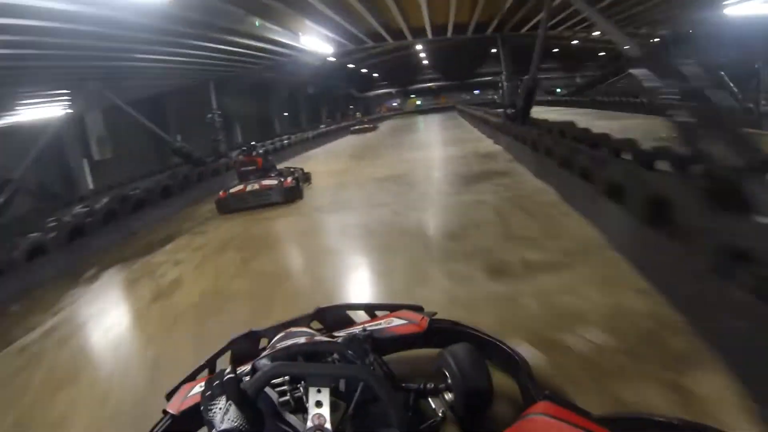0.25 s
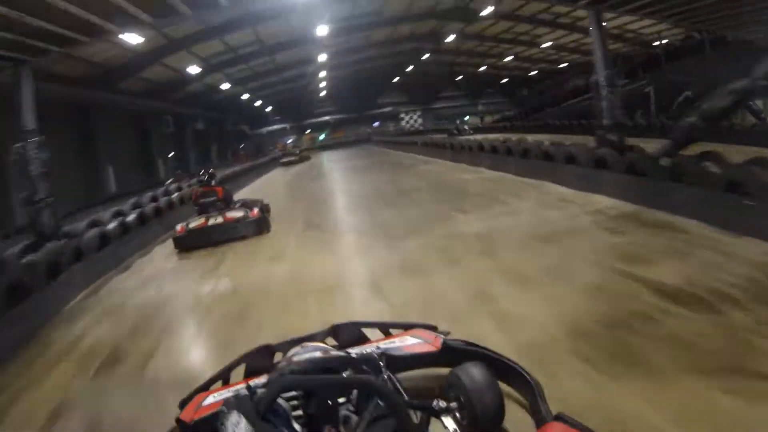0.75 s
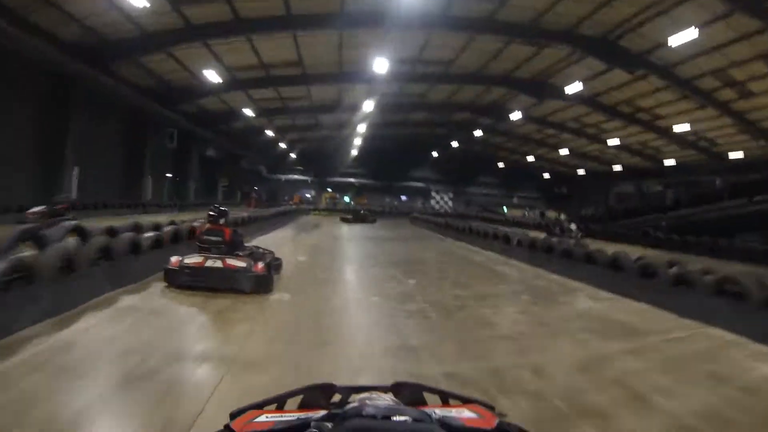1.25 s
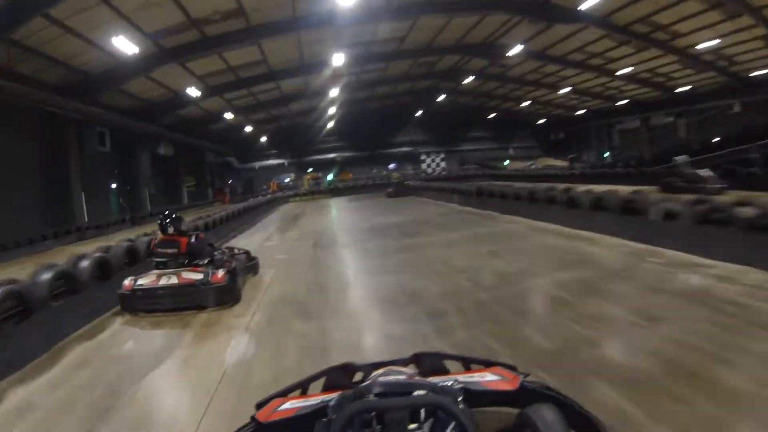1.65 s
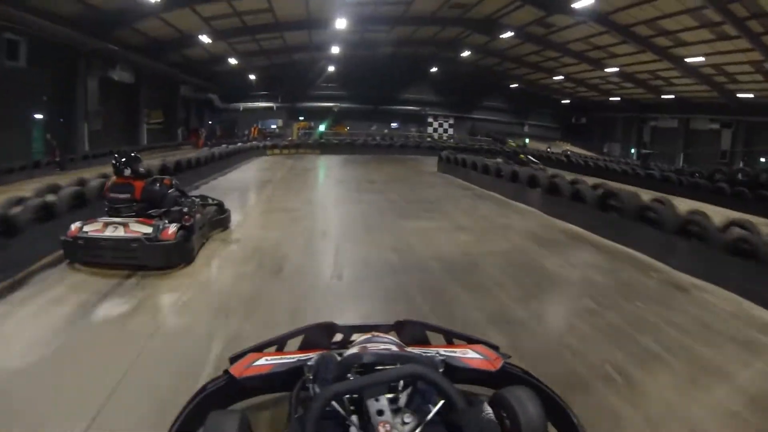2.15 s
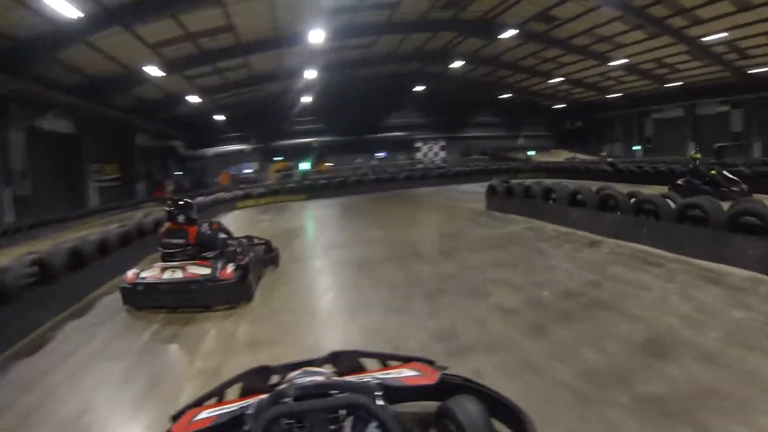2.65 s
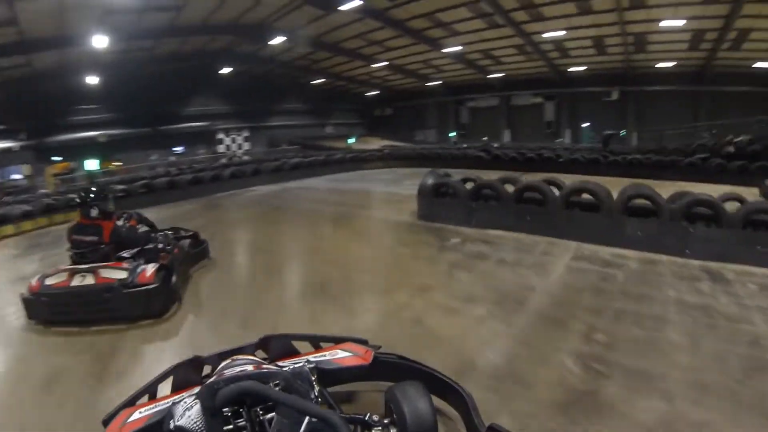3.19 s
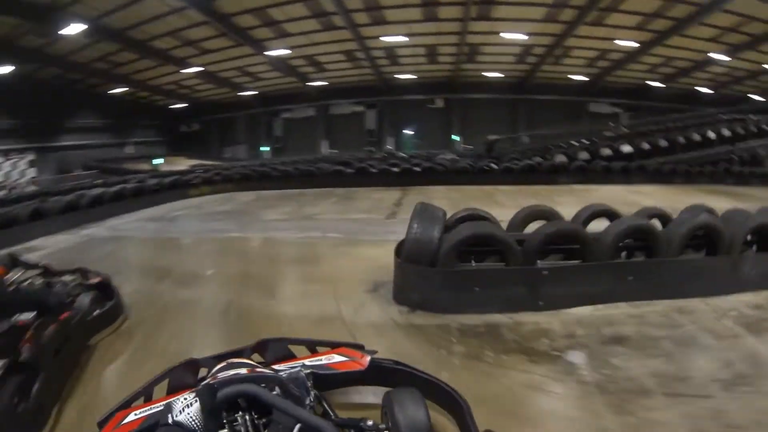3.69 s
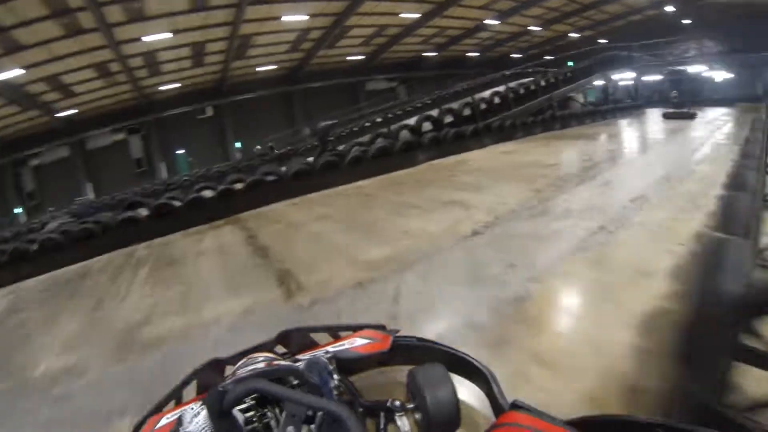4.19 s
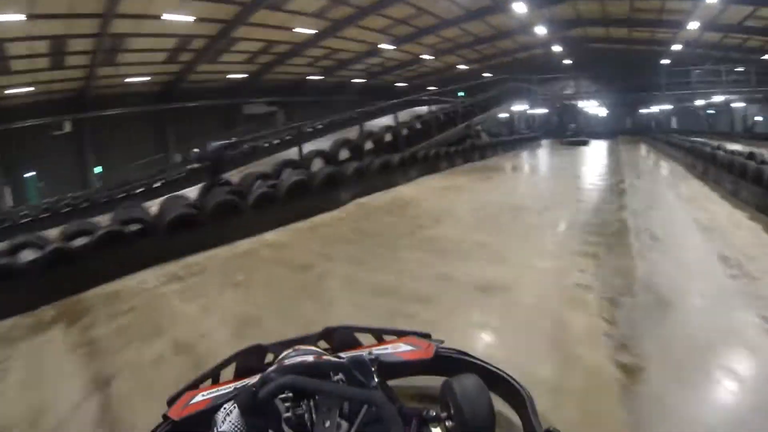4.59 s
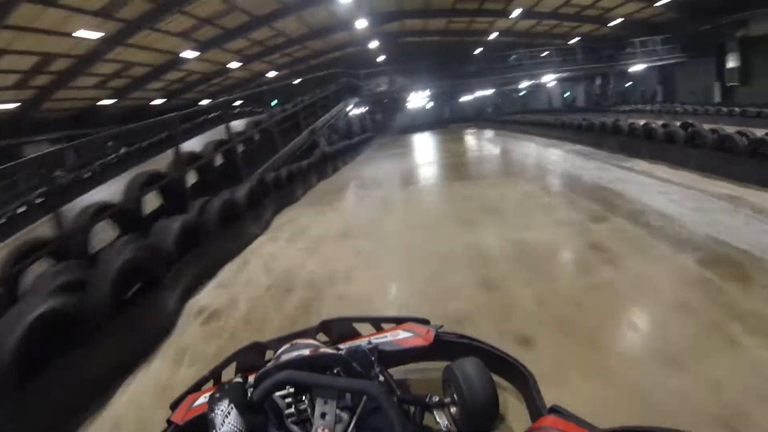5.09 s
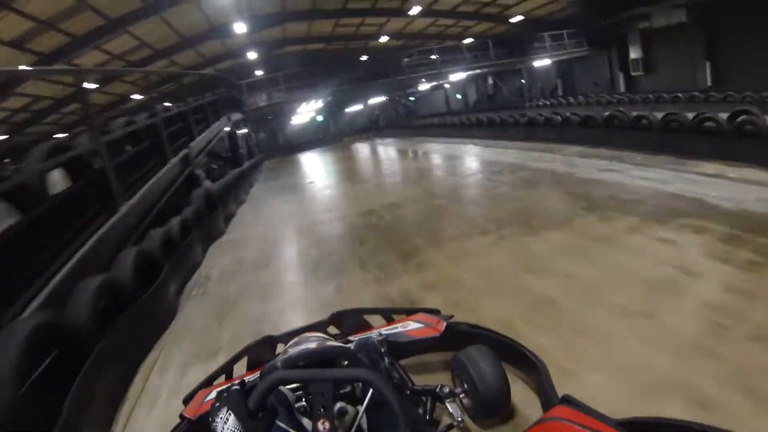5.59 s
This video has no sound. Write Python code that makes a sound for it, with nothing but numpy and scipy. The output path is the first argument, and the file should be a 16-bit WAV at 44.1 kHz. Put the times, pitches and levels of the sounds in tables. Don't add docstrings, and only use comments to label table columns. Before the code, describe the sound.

A petrol go-kart heard from inside a sealed case on the driver's helmet at an indoor track. From 0 to 1.6 seconds it runs flat out: a very heavy, rapid low throb near 33 beats a second, steady muffled engine and tyre roar, and dry plastic buzzing with tiny high squeaks, thickest between 0.4 and 0.95, including lower latch creaks. Sparser chirps follow the firings. Around 1.65 a sharp creak and grit ticks mark the throttle closing; at 1.8 a deep, short jolt briefly dulls the treble. The kart coasts, revs sinking, rattle fading, with bumpy low shakes near 2.4 and 2.9 and a neighbouring kart's faint low drone. At 3.5 the throttle stabs open, drops at 3.75, and reopens at 3.9. Low shakes swell near 3.6 and 4.45. The engine pulls slowly upward at about 24 beats, while scratchy squeaks crowd in from 4.3, harshest near 5.7, until it cuts off still driving.

```python
import sys
import numpy as np
from scipy import signal
from scipy.fft import rfft, irfft, next_fast_len
from scipy.io import wavfile
from scipy.ndimage import uniform_filter1d, map_coordinates

SR = 44100
rng = np.random.default_rng(int(sys.argv[2]) if len(sys.argv) > 2 else 0)


def gain_from_db(level_db):
    decades = np.asarray(level_db, float) / 20
    return 10 ** decades


def dump(signal):
    limited = np.clip(np.atleast_2d(signal).T, -1, 1)
    pcm = np.round(limited * 32767).astype(np.int16)
    wavfile.write(sys.argv[1], SR, pcm)


N = 257544

# time in seconds, firings per second.
FIRING_RATE = [(0, 32.7), (.22, 32.1), (.6, 33), (1.02, 32.5), (1.14, 33.1), (1.62, 34.3), (1.9, 29),
               (2.2, 25.3), (2.6, 23.6), (3.0, 22.5), (3.5, 21.8), (3.67, 22.6), (3.81, 21.8), (4.16, 23.1),
               (4.3, 24.3), (5.05, 24.6), (5.68, 25.2), (5.84, 25.8)]
# time in seconds, opening from 0 to 1.
THROTTLE_OPENING = [(0, 1), (1.6, 1), (1.68, .1), (3.45, .1), (3.55, 1), (3.69, 1), (3.75, .25),
                    (3.87, .25), (3.92, 1), (5.84, 1)]
# frequency in Hz, level in dB.
PIPE_SPECTRUM = [(40, -6), (70, -0.5), (100, 5), (145, 4.5), (175, -10), (222, -2), (245, -13), (272, -2.5),
                 (298, -7.5), (324, 3.5), (345, -6.5), (370, -13), (440, -17.5), (600, -19.5), (2000, -140)]
# time in seconds, extra shake in dB.
FLOOR_BUMPS = [(0.03, 3), (0.12, 5.5), (0.28, 5.5), (0.35, 5.5), (0.45, 5), (0.55, 0.5), (0.7, 2.5),
               (0.9, 5.5), (1.02, 4), (1.41, 5), (1.53, 1), (1.95, 10.5), (2.44, 16), (2.62, 3), (2.9, 10),
               (3.25, 4), (3.4, 6), (3.58, 12.5), (3.68, 12), (4.0, 6), (4.2, -4), (4.36, 11), (4.46, 15.5),
               (4.56, 10.5), (4.72, -2), (5.04, 3.5), (5.3, 4.5), (5.58, 7), (5.7, 6), (5.82, -3)]
# frequency in Hz, density in dB per Hz.
ROCK_SPECTRUM = [(12, -14), (24, -4), (44, 0), (62, -11.5), (90, -30), (200, -36), (400, -37), (600, -50),
                 (2000, -140)]
# frequency in Hz, density in dB per Hz.
SWAY_SPECTRUM = [(0, -54), (2, 4.0), (6, -7.5), (14, -2.0), (22, -6.5), (40, -85), (200, -160)]
# start in seconds, level in dB, ring in Hz, t60 in seconds.
FLOOR_JOINTS = [
    (1.801, -3, 40.8, 0.17),
    (2.927, -26, 46.2, 0.1),
    (4.328, -34, 40.3, 0.42),
]
# time in seconds, level in dB.
ROAR_LEVEL = [(0, -35), (.45, -35.5), (.6, -33), (.75, -35.5), (1.2, -33), (1.75, -34), (2.2, -35.5),
              (3.3, -37), (3.66, -36), (4.1, -36), (4.55, -37), (4.7, -35.5), (5.84, -36)]
# frequency in Hz, density in dB per Hz.
CASE_SPECTRUM = [(180, 0.5), (300, -5), (540, -10), (850, -6.5), (1070, -2), (1990, -4), (2460, -16.5),
                 (3130, -7), (3700, -16.5), (4800, -20), (6300, -36), (7000, -37), (8000, -36.5),
                 (12500, -48), (15500, -65)]
# frequency in Hz, width in Hz, boost in dB.
WALL_MODES = [(1027, 43, 5.5), (1220, 270, 3.5), (1857, 114, 4.5), (2016, 97, 4.5), (2627, 280, 7),
              (3100, 250, 0)]
# start in seconds, peak in dB, first and last slip rate in Hz, length in seconds.
STRAIGHT_SQUEAKS = [(0.073, -32, 4840, 5800, 0.015), (0.2005, -34, 5540, 5200, 0.019),
                    (0.2165, -41, 5500, 4960.0, 0.019), (0.3712, -34, 5650, 5600, 0.014),
                    (.376, -33, 4700, 4300, .006), (.426, -35, 5120, 4920, .012),
                    (0.384, -30.5, 5590.0, 5770.0, 0.022), (0.4031, -32, 5850, 5950, 0.019),
                    (0.419, -40, 5210.0, 5230, 0.025), (0.5078, -37, 4430, 5020.0, 0.034),
                    (0.5398, -30, 5580, 5540.0, 0.015), (0.5527, -33, 5700, 5100, 0.015),
                    (0.6316, -28, 5210.0, 4480, 0.016), (0.6455, -27, 5130, 5580.0, 0.016),
                    (0.6615, -22, 4920, 5030, 0.016), (0.6894, -37, 4250.0, 4960.0, 0.02),
                    (0.7842, -27, 5960, 5500, 0.013), (0.7972, -28, 4800, 5300, 0.014),
                    (0.8122, -23, 4720, 4760, 0.012), (0.8381, -31, 5600.0, 5450, 0.024),
                    (0.862, -36, 5360, 4650.0, 0.016), (0.9049, -29, 4930, 5750, 0.018),
                    (0.9199, -28.5, 5540, 5160.0, 0.015), (0.9339, -33, 5800, 5120.0, 0.017)]
# start in seconds, peak in dB,
# first and last slip rate in Hz, length in seconds.
LATCH_CREAKS = [(0.308, -24, 3100, 3060, 0.0093), (0.416, -22, 2930, 2700, 0.022),
                (0.44, -18, 2700, 2600, 0.011), (0.514, -19.5, 2770, 2780, 0.024),
                (0.532, -19.5, 3050, 3150, 0.024), (0.574, -14.5, 3100, 3100, 0.01),
                (0.809, -21, 3240, 3180, 0.015), (0.499, -20, 1970, 1830, .02),
                (0.535, -23.5, 1935, 1760, 0.0255), (0.574, -19, 1810, 1810, 0.023),
                (0.635, -14, 1766, 1890, 0.014), (0.66, -17.5, 1914, 2010, 0.028)]
# start in seconds, peak in dB, first and last slip rate in Hz, length in seconds.
FADING_SQUEAKS = [(0.998, -27, 5500, 5500, 0.0063), (1.029, -29, 5600, 5500, 0.0074),
                  (1.061, -28, 5000, 5200, .007), (1.091, -28, 5600, 5800, .007),
                  (1.153, -35, 4100, 4470, 0.009), (1.18, -26, 5730, 5700, 0.0088),
                  (1.214, -36, 4700, 4400, .006), (1.243, -31, 4700, 4200, 0.011),
                  (1.272, -24.5, 5850, 5230, 0.0093), (1.305, -33, 5560, 5700, .008),
                  (1.362, -27, 5600, 5500, .006), (1.392, -32, 5600, 5730, .008),
                  (1.484, -32, 4740, 4900, .015), (1.503, -33, 5500, 5500, .008),
                  (1.507, -24, 4800, 4600, 0.007), (1.522, -27, 5440, 4540, 0.0098),
                  (1.536, -30, 5500, 4830, 0.016), (1.578, -42, 4930, 4900, 0.016),
                  (1.649, -16, 3190, 3100, 0.007)]
# start in seconds, peak in dB,
# first and last slip rate in Hz, length in seconds.
BEND_SQUEAKS = [(3.4536, -25, 4550, 5970, 0.014), (3.469, -28, 5470, 6000, 0.02),
                (3.5868, -27.5, 4480, 5300, 0.013), (3.5984, -29, 5660.0, 5600, 0.019),
                (3.981, -31, 5630, 6100, 0.015), (3.9959, -33, 6610.0, 6000, 0.016),
                (4.1, -30.5, 5750, 5600, .011), (4.1096, -24, 4200, 5160, 0.011),
                (4.2294, -27, 5500, 5760.0, 0.011), (4.241, -30, 4700, 4960.0, 0.01),
                (4.2982, -24.5, 4950, 5200, 0.023), (4.3182, -24, 5530, 5770.0, 0.013),
                (4.3341, -30, 6290.0, 5900, 0.017), (4.3711, -33, 4740, 5600.0, 0.019),
                (4.385, -34, 5580, 5660.0, 0.027), (4.404, -26.5, 5500, 4950.0, 0.035),
                (4.4245, -27, 4840, 5000, 0.013), (4.4349, -26, 5240, 4870.0, 0.02),
                (4.4579, -37, 6040, 6850, 0.019), (4.5024, -19, 4430, 4950, 0.0116),
                (4.514, -33, 5750, 6040, .014), (4.6365, -27.5, 5460.0, 5950.0, 0.02),
                (4.656, -32, 5820, 5500, 0.036), (4.678, -26, 5110, 5070, 0.025),
                (4.704, -22, 5570, 5900, 0.016), (4.7213, -29, 5620, 5240.0, 0.013),
                (4.7526, -24, 5200, 4900, 0.0081), (4.7632, -29, 4710.0, 4900, 0.017),
                (4.7781, -30, 5120.0, 5440, 0.025)]
# start in seconds, peak in dB,
# first and last slip rate in Hz, length in seconds.
POWER_SQUEAKS = [(4.8041, -25, 4950, 4780, 0.012), (4.815, -22, 4500, 4700, .009),
                 (4.796, -29, 5600, 5400, .008), (4.83, -18.5, 4440, 5100, 0.0091),
                 (4.8819, -26, 4840.0, 4120, 0.025), (4.9049, -30, 5660, 5580, 0.02),
                 (4.9238, -24, 4760.0, 4540.0, 0.015), (4.9388, -24, 4040, 4640, 0.014),
                 (4.9498, -22, 4900, 4910.0, 0.014), (4.9687, -28, 6100, 5890.0, 0.034),
                 (4.9956, -24.5, 5010.0, 4670.0, 0.032), (5.0256, -38, 6080, 5520, 0.027),
                 (5.0575, -22, 4820, 5130, 0.013), (5.0725, -27, 5000, 4900, 0.017),
                 (5.0874, -20.5, 5730, 5730, 0.015), (5.1024, -36, 5700.0, 5530, 0.03),
                 (5.1373, -29, 4180, 4730, 0.014), (5.1693, -26.5, 4900.0, 5000, 0.03),
                 (5.1902, -27, 4820, 5160.0, 0.0175), (5.2062, -24, 5440.0, 5350.0, 0.023),
                 (5.2291, -26, 5600, 4930.0, 0.019), (5.2511, -39, 4540, 4790.0, 0.023),
                 (5.285, -28, 4640, 5010.0, 0.02), (5.3029, -23, 4990, 4550.0, 0.013),
                 (5.3129, -21, 4830, 4840.0, 0.015), (5.3359, -28, 5200, 4930, 0.017),
                 (5.3558, -20, 4970.0, 4790.0, 0.0074), (5.3808, -26, 4180.0, 4580.0, 0.009),
                (5.3927, -24, 5060.0, 4960.0, 0.011), (5.4087, -23.5, 4670.0, 4590.0, 0.0091),
                (5.4227, -27.0, 4730.0, 4460, 0.035), (5.4526, -31, 5000.0, 5040.0, 0.014),
                (5.4756, -25, 4940.0, 4200, 0.021), (5.4935, -28, 4360, 4680.0, 0.015),
                (5.5364, -45, 4580.0, 4390.0, 0.021), (5.5584, -37, 4100.0, 4390.0, 0.013),
                (5.5713, -46, 5040.0, 4930, 0.014), (5.5963, -20.5, 4340.0, 4500, 0.01),
                (5.6063, -18.5, 4720, 4970, 0.0099), (5.6202, -35, 4540.0, 5000, 0.016),
                (5.6382, -22.5, 5110.0, 4650.0, 0.021), (5.6731, -16, 4120, 4990.0, 0.016),
                (5.7145, -16, 4420, 5100, 0.008), (5.722, -20, 4880, 4430, 0.012),
                (5.7589, -20, 4210, 4570.0, 0.014), (5.7888, -23, 4520.0, 5420.0, 0.029),
                (5.8268, -32, 4930.0, 4900, 0.016)]
# start in seconds,
# peak in dB, first and last slip rate in Hz, length in seconds.
EXTRA_SQUEAKS = [(0.66, -34, 5660, 5550, 0.02), (4.335, -36, 6700, 6600, .015),
                 (4.43, -36, 6600, 6860, .015), (4.964, -37, 6600, 6070, 0.023),
                 (4.99, -39, 5800, 5700, 0.022), (5.013, -37, 4360, 4200, 0.019),
                 (5.035, -29, 5800, 5200, 0.017), (5.157, -35, 5800, 5600, 0.039),
                 (5.201, -35, 5800, 6300, 0.033), (5.245, -37, 5700, 6300, .03),
                 (5.29, -38, 5600, 5700, 0.033), (5.33, -33, 5800, 5700, 0.022),
                 (5.385, -36, 5500, 5570, .02), (5.445, -40, 5300, 5500, .02),
                 (5.583, -32, 5800, 5700, .012), (5.685, -38, 5600, 6300, 0.011),
                 (5.736, -31, 4600, 4440, .02), (5.772, -26, 4540, 4400, .014),
                 (5.812, -28, 5500, 5300, .012), (5.558, -32, 4200, 4400, 0.0091),
                 (5.076, -38, 2820, 2810, .02), (4.908, -33, 5600, 5500, .015)]
# time in seconds, level over the chatter in dB, slip rate in Hz.
JOINT_STRAIN = [(0, 2.5, 5510), (3.3, 9.5, 5550), (4.5, -1, 5400), (4.7, 10.5, 5300), (5.1, 9.5, 5290),
                (5.5, 8, 4725), (5.72, 12, 4710), (5.84, 16, 5170)]
# frequency in Hz, width in Hz, level in dB.
MOUNT_MODES = [(4295, 91, 8), (4840, 220, 1.5), (5660, 51, 4.5), (6300, 300, -30), (9800, 700, 12.5),
               (11240, 700, 5)]
# time in seconds, chatter level in dB.
MOUNT_PLAY = [(0, -51), (.72, -49), (.78, -45.5), (1.46, -54.5), (1.63, -53), (3.19, -73), (3.43, -56.5),
              (4.2, -54), (4.6, -49.5), (4.86, -50.5), (4.92, -44), (5.3, -46), (5.58, -56.5), (5.84, -45)]
# time in seconds, extra chatter in dB.
HEAD_JERKS = [(0.08, 6.5), (0.18, 2), (0.39, 2), (0.43, 7), (0.52, 9), (0.56, 8), (0.67, 15), (0.84, 6),
              (0.93, -3), (1.51, 9.5), (3.48, -7), (3.61, 3), (3.99, -5), (4.11, 5), (4.24, 1), (4.31, 2),
              (4.41, 6), (4.8, 5.5), (5.61, 7), (5.72, 3), (5.8, 8)]
# frequency in Hz, density in dB per Hz.
CHATTER_SPECTRUM = [(1500, -55), (2700, -22), (3100, -5), (3800, -3.5), (4900, 2.5), (5700, 0),
                    (7000, -7.5), (8800, -11), (10000, -13), (12000, -14.5), (13000, -15), (15500, -44)]
# start in seconds, level in dB.
GRIT_TICKS = [
    (1.6495, -42),
    (1.651, -41),
    (1.797, -49),
]
# peak in seconds, level in dB, pitch
# in Hz, length in seconds.
BRIEF_HUMS = [(0.26, -34.5, 194, 0.3), (2.355, -37.5, 685, 0.066), (5.75, -37.5, 434, 0.04),
              (1.49, -41.5, 310, 0.25), (2.962, -17, 42, 0.12), (2.545, -20.5, 37, 0.21),
              (4.84, -19.5, 44, 0.093), (4.3, -40.5, 220, .2), (5.7, -46, 790, 0.56),
              (0.9, -34.5, 167, 0.041), (4.3, -38, 78, 0.35), (2.28, -40.5, 120, 0.24),
              (0.0377, -35, 135, 0.1)]
# time in seconds, level in dB.
RIVAL_LEVEL = [(0, -48), (1.7, -67), (2.2, -59), (2.5, -46), (3.2, -48), (3.55, -48), (3.75, -65),
               (3.95, -50), (4.2, -50), (5.84, -48)]
# frequency in Hz, level in dB.
RIVAL_SPECTRUM = [(120, -59), (180, -5.5), (215, 2.5), (255, -4.5), (340, -28), (1000, -140)]
# time in seconds, treble gain in dB.
GAIN_DUCK = [(0, 2), (1.815, -0.5), (1.83, -9), (1.86, -7), (1.92, -1), (5.84, 0)]
# centre in seconds, half length in seconds, depth from 0 to 1.
THIN_MOMENTS = [
    (.8155, .007, .97),
    (1.587, .0035, .9),
    (4.659, .0045, .9),
    (5.026, .007, .99),
    (5.086, .006, .94),
    (5.744, .007, .97),
]
# low edge in Hz, high edge in Hz.
THIN_BANDS = [
    [(3050, 3400), (4450, 5050)],
    [(2600, 3350), (4750, 5100)],
    [(5300, 6300)],
    [(4100, 5050)],
    [(2650, 2950), (4700, 5050), (5400, 5750)],
    [(4050, 5250)],
]

SEAT_HZ, SEAT_WIDTH_HZ, SEAT_PEAK_DB = 34.05, 10.8, 18
SEAT_FLUTTER_DB = 0.7
CRANK_DAMP = 0.16
SHAKE_SHUT_DB, SHAKE_OPEN_DB = -38, -35
CRANK_SHUT_DB, CRANK_OPEN_DB = -36, -34
THUD_SHUT_DB, THUD_OPEN_DB = -59, -39.5
LUG_DB_PER_HZ = 0.3
CRANK_SHARE, ROCK_SHARE, THUD_SHARE = 0.62, 0.89, 0.034
ROCK_DB, SWAY_DB, SWAY_SWING_DB = -35.5, -29, 2.5


def unit(x):
    return x / np.sqrt(np.mean(x ** 2) + 1e-20)


def along(points, hz):
    f, v = np.transpose(points)
    return np.interp(np.log(hz + 1), np.log(f + 1), v)


def curves(rows):
    s, *columns = np.transpose(rows)
    return [np.interp(np.arange(N) / SR, s, column) for column in columns]


def swells(rows, rise_s, fall_s):
    t = np.arange(N) / SR
    each = [np.interp(t, [s - rise_s, s, s + fall_s], [0, db, 0]) for s, db in rows]
    return np.max(each, axis=0)


def wobble(rate, size=N):
    knots = rng.standard_normal(int(size * 4000 / SR) + 9)
    return map_coordinates(knots, [np.arange(size) * min(rate, 4000) / SR])


def filtered(x, response):
    m = next_fast_len(N + SR // 2)
    return irfft(rfft(x, m) * response(np.fft.rfftfreq(m, 1 / SR)), m)[:N]


def coloured(x, spectrum):
    return unit(filtered(x, lambda hz: gain_from_db(along(spectrum, hz))))


def pressing():
    return swells(FLOOR_BUMPS, rise_s=0.07, fall_s=0.09)


def looseness():
    return curves(MOUNT_PLAY)[0] + swells(HEAD_JERKS, rise_s=0.053, fall_s=0.047)


def engine_cycles():
    return np.cumsum(curves(FIRING_RATE)[0]) / SR + 0.857


def seat_shake(cycles):
    rate, opening, bump_db = curves(FIRING_RATE)[0], curves(THROTTLE_OPENING)[0], pressing()
    seat_db = SEAT_PEAK_DB / (1 + ((rate - SEAT_HZ) / SEAT_WIDTH_HZ * 2) ** 2)
    shake_db = SHAKE_SHUT_DB + (SHAKE_OPEN_DB - SHAKE_SHUT_DB + seat_db) * opening + bump_db
    shake_db = shake_db + SEAT_FLUTTER_DB * wobble(8.2)
    crank_db = CRANK_SHUT_DB + (CRANK_OPEN_DB - CRANK_SHUT_DB) * opening
    crank_db = crank_db + CRANK_SHARE * bump_db - CRANK_DAMP * seat_db
    lag = 1.4 * np.arctan((rate - 33) / 4)
    phase = 2 * np.pi * cycles - lag + 0.18 * wobble(10)
    firing_shake = gain_from_db(shake_db + 2.0) * np.sin(phase)
    crank_shake = gain_from_db(crank_db + 0.5) * np.cos(2 * phase + 0.5 * wobble(4.59))
    return firing_shake + crank_shake


def exhaust_thuds(cycles):
    rate, opening = curves(FIRING_RATE)[0], curves(THROTTLE_OPENING)[0]
    pull_db = THUD_OPEN_DB - THUD_SHUT_DB + LUG_DB_PER_HZ * (SEAT_HZ - rate)
    thud_db = THUD_SHUT_DB + pull_db * opening + THUD_SHARE * pressing()
    at = np.flatnonzero(np.diff(np.floor(cycles)))
    chance = rng.standard_normal((200, 2))[:len(at)]
    scatter_s = 0.001 - 0.00094 * opening[at]
    late = np.round(scatter_s * SR * chance[:, 0]).astype(int)
    firings = np.zeros(N)
    firings[np.clip(at + late, 0, N - 1)] = gain_from_db(0.8 * chance[:, 1])

    def pipe(hz):
        spread = np.exp(-2j * np.pi * hz * (0.0237 - hz * 3.1e-5))
        return gain_from_db(along(PIPE_SPECTRUM, hz)) * spread

    return -gain_from_db(thud_db) * unit(filtered(firings, pipe))


def rocking():
    rock_db = ROCK_DB + ROCK_SHARE * pressing()
    return gain_from_db(rock_db + 1.0) * coloured(rng.standard_normal(N), ROCK_SPECTRUM)


def swaying():
    sway_db = SWAY_DB + SWAY_SWING_DB * wobble(3.95)
    return gain_from_db(sway_db) * coloured(rng.standard_normal(N), SWAY_SPECTRUM)


def roar(cycles):
    puff_db = 0.5 * np.cos(2 * np.pi * cycles + 2.6) + 0.16 * wobble(14) + 0.71 * wobble(120)
    z = signal.stft(gain_from_db(puff_db) * rng.standard_normal(N), nperseg=512)[2]
    patches = uniform_filter1d(rng.standard_normal(z.shape), size=3, axis=0)
    patches = uniform_filter1d(patches, size=14, axis=1)
    air = signal.istft(z * gain_from_db(1.05 * unit(patches)), nperseg=512)[1][:N]

    def through_walls(shift):
        def walls(hz):
            modes_db = sum(db / (1 + ((hz - c * shift) / w * 2) ** 2) for c, w, db in WALL_MODES)
            return gain_from_db(along(CASE_SPECTRUM, hz) + modes_db)
        return filtered(air, walls)

    flex = 0.025
    slack, taut = through_walls(1 - flex), through_walls(1 + flex)
    flexed = np.clip(pressing() / 8, 0, 1)
    return gain_from_db(curves(ROAR_LEVEL)[0] + 2.5) * unit(slack + flexed * (taut - slack))


def joints():
    out, t = np.zeros(N + SR), np.arange(SR // 2) / SR
    kick_db, kick_hz, kick_t60_s = -8.5, 128, 0.0092
    for s, db, hz, t60 in FLOOR_JOINTS:
        bent_time = t + 0.0011 * (1 - np.exp(-t / 0.026))
        ring = -np.sin(2 * np.pi * hz * bent_time) * (1 - np.exp(-t / 0.0055))
        kick = gain_from_db(db + kick_db - 60 * t / kick_t60_s) * np.sin(2 * np.pi * kick_hz * t)
        out[round(s * SR):][:len(t)] += gain_from_db(db - 60 * t / t60) * ring + kick
    return out[:N]


def squeak(db, first_hz, last_hz, length):
    t = np.arange(SR // 14) / SR

    def shaky(rate):
        return wobble(rate, size=len(t))

    u = t / max(length, 0.003)
    glide = first_hz + (last_hz - first_hz) * u
    pitch = glide * (1 + 0.024 * shaky(300) + 0.031 * shaky(1500))
    phase = 2 * np.pi * np.cumsum(pitch) / SR
    fade = np.clip(1 - u / 1.42, 0, 1) ** 0.67
    grip = np.clip(t / 0.0036, 0, 1) * fade * (0.6 + 0.5 * np.tanh(0.75 * shaky(330)))
    edge = 0.33 * shaky(280) * np.sin(phase * (1.12 + 0.0426 * rng.standard_normal()))
    octave = gain_from_db(3.4 * shaky(135) - 25) * np.sin(2 * phase + 1.1 * shaky(1380))
    scrape = 0.21 * shaky(2490) * np.cos(phase)
    return gain_from_db(db) * grip * (np.sin(phase) + octave + edge + scrape)


def screech():
    strain_db, slip_hz = curves(JOINT_STRAIN)
    wander = 1 + 0.078 * wobble(45) + 0.055 * wobble(400) + 0.03 * wobble(2500)
    phase = 2 * np.pi * np.cumsum(slip_hz * wander) / SR
    grip = 0.5 + 0.78 * np.tanh(1.0 * wobble(250))
    return gain_from_db(looseness() + strain_db) * grip * (np.sin(phase) + gain_from_db(-18.5) * np.sin(2 * phase))


def mount_noises():
    out = np.zeros(N + SR)
    rows = STRAIGHT_SQUEAKS + LATCH_CREAKS + FADING_SQUEAKS + BEND_SQUEAKS
    for s, *shape in rows + POWER_SQUEAKS + EXTRA_SQUEAKS:
        slip = squeak(*shape)
        out[round(s * SR):][:len(slip)] += slip

    def body(f):
        modes = [gain_from_db(db - 8.0) * 1j * f * w / (c * c - f * f + 1j * f * w) for c, w, db in MOUNT_MODES]
        return 0.4 + sum(modes)

    return filtered(out[:N] + screech(), body)


def buzz(cycles):
    knock_db = 2.0 * wobble(300) + 1.5 * wobble(45) + 1.7 * np.cos(4 * np.pi * cycles)
    knocks = gain_from_db(knock_db) * rng.standard_normal(N)
    return gain_from_db(looseness() - 4.5) * coloured(knocks, CHATTER_SPECTRUM)


def ticks():
    out, t = np.zeros(N + SR), np.arange(SR // 100) / SR
    for s, db in GRIT_TICKS:
        out[round(s * SR):][:len(t)] += gain_from_db(db - 60 * t / 0.0012) * rng.standard_normal(len(t))
    return filtered(out[:N], lambda hz: np.clip(hz / 4000, 0, 1) ** 2)


def hums():
    t, drift = np.arange(N) / SR, np.cumsum(wobble(30)) / SR
    out = np.zeros(N)
    for s, db, hz, length in BRIEF_HUMS:
        swell = np.cos(np.pi * np.clip((t - s) / length, -0.5, 0.5)) ** 2
        unsteady_time = t - s + 0.0075 * (drift - drift[round(s * SR)])
        out += gain_from_db(db) * swell * np.cos(2 * np.pi * hz * unsteady_time)
    return out


def rival():
    cycles = np.cumsum(18.7 + 0.292 * wobble(1.7)) / SR
    drone = np.diff(np.floor(cycles), prepend=0) + 0.017 * rng.standard_normal(N)
    return gain_from_db(curves(RIVAL_LEVEL)[0]) * coloured(drone, RIVAL_SPECTRUM)


def scene():
    cycles = engine_cycles()
    engine = seat_shake(cycles) + exhaust_thuds(cycles)
    road = rocking() + swaying() + roar(cycles) + joints()
    mount = mount_noises() + buzz(cycles)
    return (engine + road + mount + ticks() + hums() + rival())[None]


def low_pass(x):
    return signal.sosfilt(signal.butter(12, 15140, fs=SR, output="sos"), x)


def record(dry):
    t = np.arange(N) / SR
    bass = filtered(dry[0], lambda hz: 1 / (1 + (hz / 300) ** 2))
    sound = bass + gain_from_db(curves(GAIN_DUCK)[0]) * (dry[0] - bass)
    for (s, half, depth), bands in zip(THIN_MOMENTS, THIN_BANDS):

        def surviving(hz):
            return (hz < 2150) + sum((hz > low) & (hz < high) for low, high in bands)

        thin = filtered(sound, surviving)
        fade = np.clip((half - np.abs(t - s)) / 0.003 + 0.5, 0, 1)
        sound = sound + depth * fade * (thin - sound)
    return low_pass(sound[None])


dry = scene()
out = record(dry)
dump(out)
```